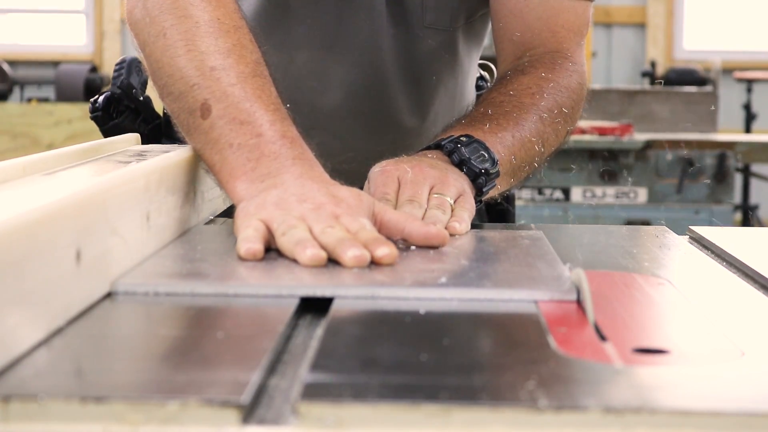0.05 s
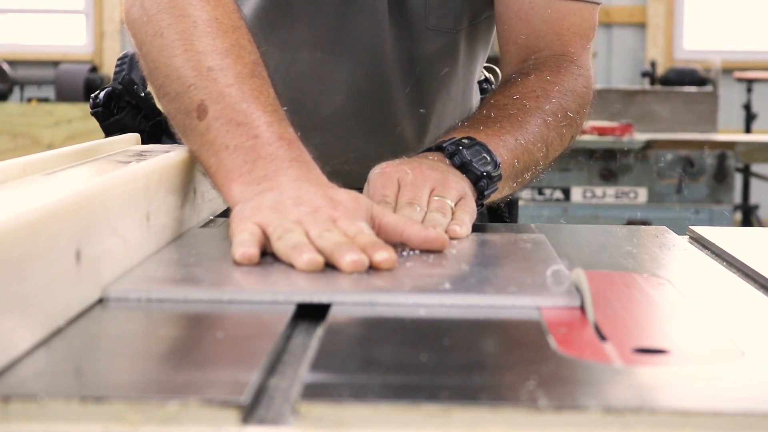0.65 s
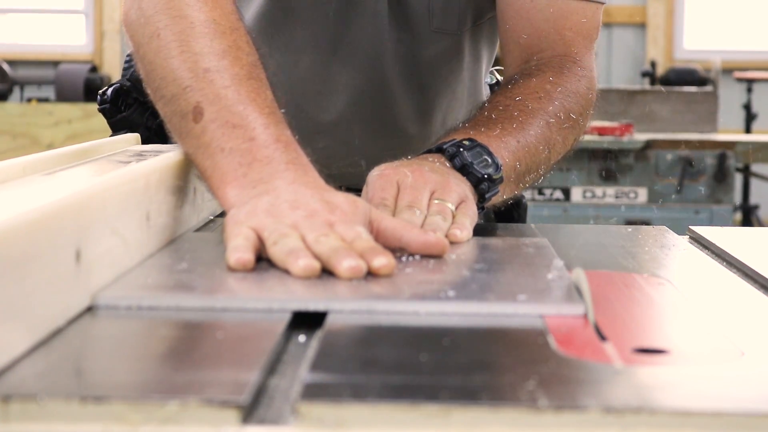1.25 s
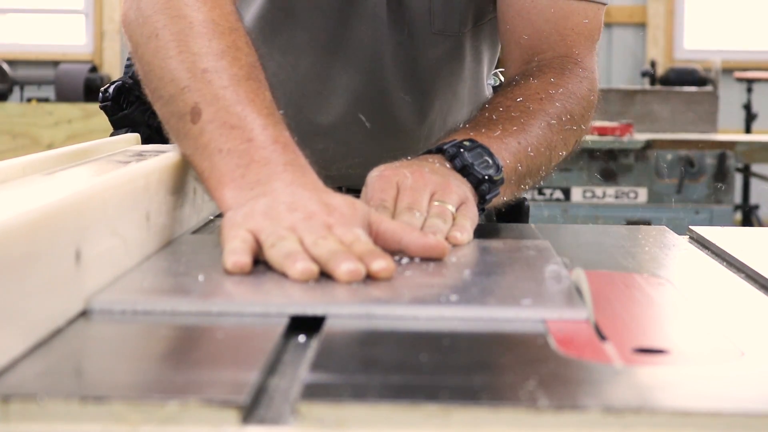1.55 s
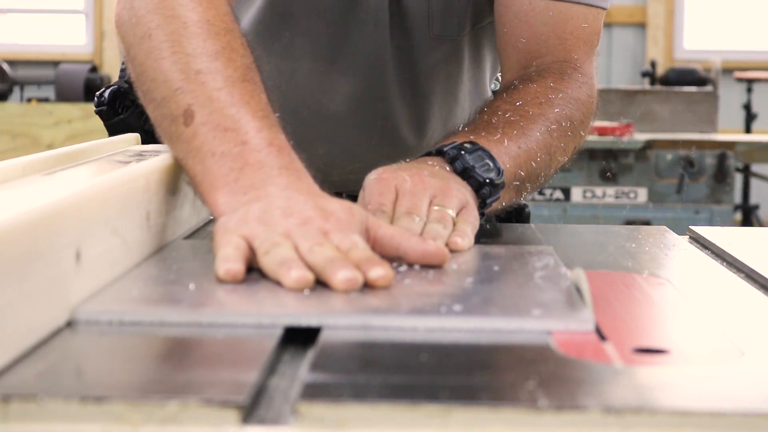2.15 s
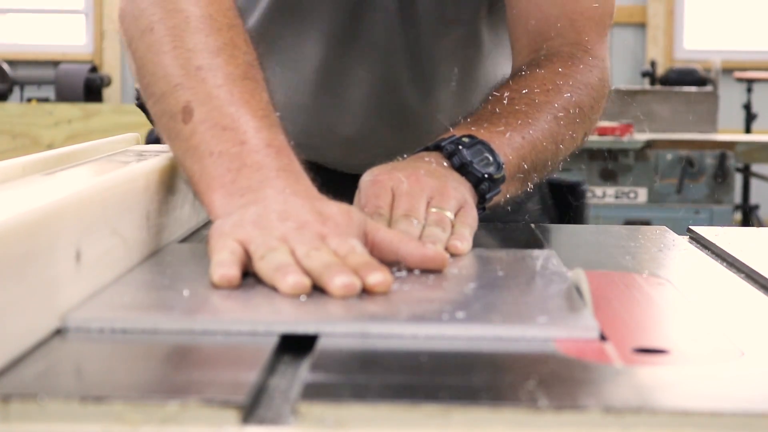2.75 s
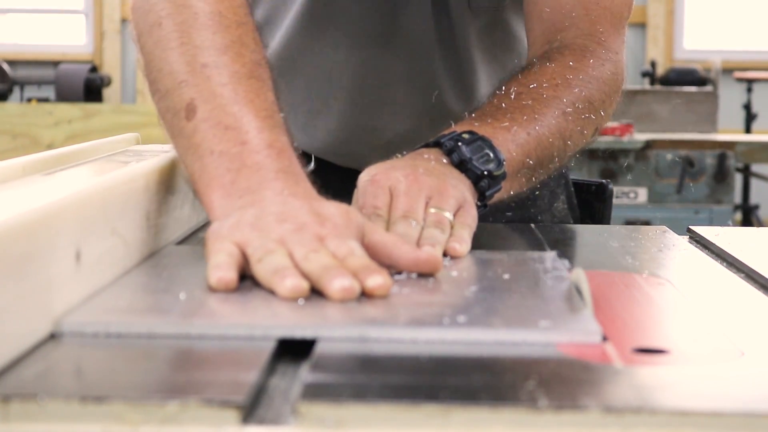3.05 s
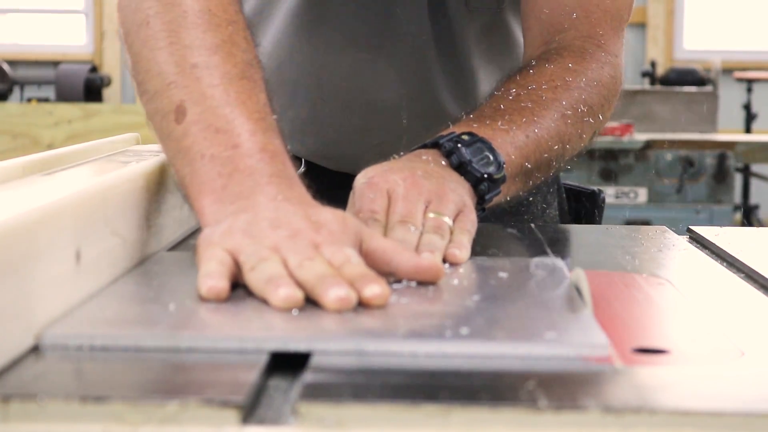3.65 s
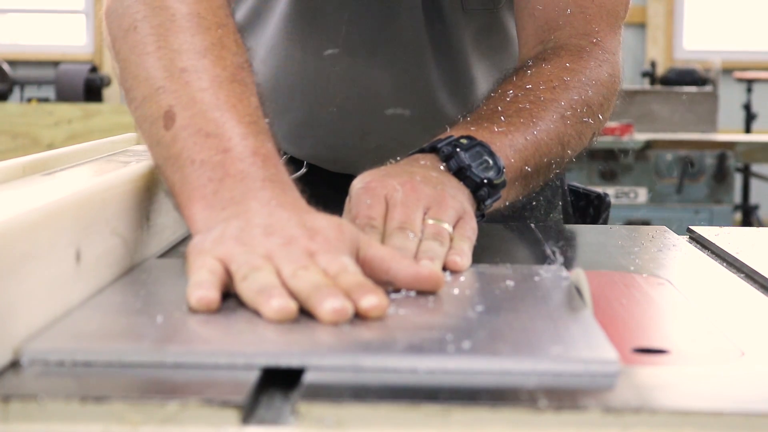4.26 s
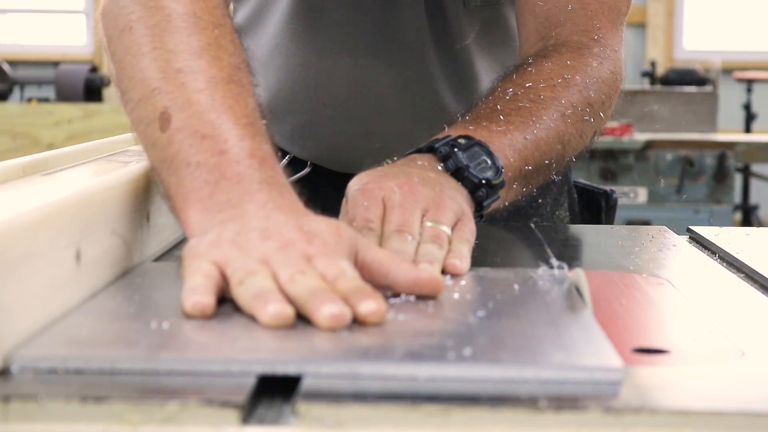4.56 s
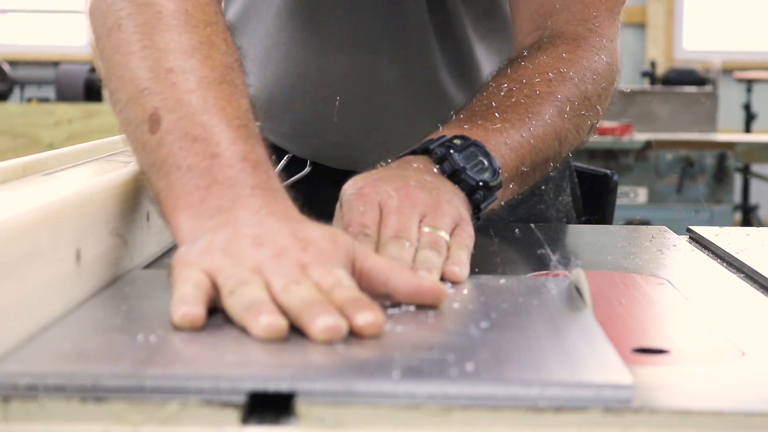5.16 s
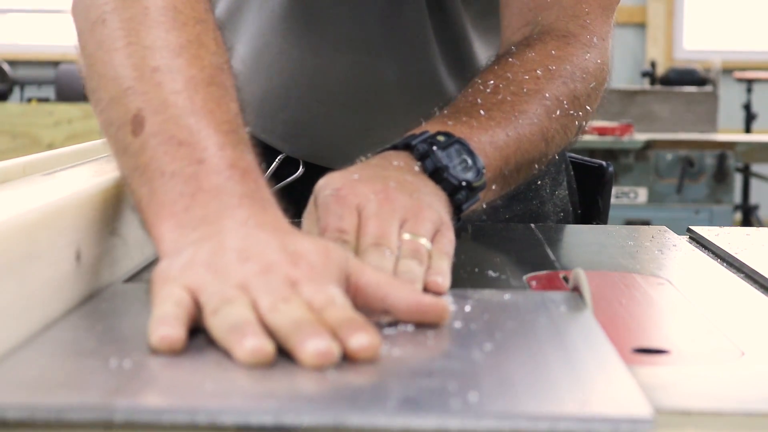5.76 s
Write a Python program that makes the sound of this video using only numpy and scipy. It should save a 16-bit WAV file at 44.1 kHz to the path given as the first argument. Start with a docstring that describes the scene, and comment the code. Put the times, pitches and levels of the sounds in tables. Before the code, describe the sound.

Close, shrill rasping and squealing of a table saw going through thick metal, dropping to an airy whir near the end.

```python
"""A harsh, ringing rasp with squeals on top: a table saw is cutting a thick aluminium plate close by.
Its 60 uneven teeth scrape through the metal turn after turn, the blade chatters and squeals as it
bends, and chips hiss away over a low motor hum. The push on the plate eases briefly near 2.9 s.
At 5.3 s the blade comes free and spins on with a rush of air and a thin whistle."""
import sys
import numpy as np
from scipy import signal
from scipy.fft import rfft, irfft
from scipy.io import wavfile

SR = 44100
rng = np.random.default_rng(int(sys.argv[2]) if len(sys.argv) > 2 else 0)


def persist_wave(psi):
    """Save psi, clipped to +-1, as 16-bit WAV."""
    counts = np.round(np.clip(psi, -1, 1) * 32767).astype(np.int16)
    wavfile.write(sys.argv[1], SR, np.atleast_2d(counts).T)


N = 264600

TEETH, USUAL_TURNS_PER_S = 60, 69.9
# The feed: how hard the plate is pushed into the teeth (0 is usual). Columns: time_s, level_db
FEED = [(0, .8), (.8, 0), (1.7, 0.1), (2.45, -0.3), (2.74, 0.5), (2.83, -3.5), (2.93, -1.5), (3.04, 2.5),
        (3.24, 0), (3.5, .5), (4.3, 0), (5.05, -1.2), (5.28, -3), (5.36, -6.5), (5.5, -11.5), (6, -17)]
# Rise and fall of the plate's drone, which also strains the cabinet. Columns: time_s, level_db
DRONE = [(0, -35), (.5, -34), (.6, -33.5), (1.1, -31.5), (2.2, -32), (2.74, -33), (2.88, -34.5),
         (3.04, -31.5), (3.32, -34), (3.65, -32), (5.08, -34.5), (5.35, -41), (6, -51)]


def from_db(db):
    """Turn decibels into a number to multiply by."""
    return 10 ** (np.asarray(db) / 20)


def rms_one(x):
    """Scale a signal so that its average strength (rms) is 1."""
    return x / np.sqrt(np.mean(x ** 2) + 1e-20)


def curve(rows):
    """Join (time_s, value) points with straight lines, giving one value per sample."""
    return np.interp(np.arange(N) / SR, *np.transpose(rows))


def swell(peak_s, length_s):
    """A smooth rise to 1 and back; the length is its width at half height."""
    offset = np.clip((np.arange(N) / SR - peak_s) / length_s, -1, 1)
    return .5 + .5 * np.cos(np.pi * offset)


def drift(rate_hz):
    """A smooth random wobble of typical size 1, mostly slower than rate_hz."""
    step, warm_up = 40, 2000
    decay = np.exp(-2 * np.pi * step * rate_hz / SR)
    noise = rng.standard_normal(N // step + warm_up + 2)
    slow = signal.lfilter([1], [1, -2 * decay, decay * decay], noise)[warm_up:]
    return np.interp(np.arange(N) / step, np.arange(len(slow)), rms_one(slow))


def colour(x, spectrum):
    """Make some pitches stronger and others weaker."""
    hz, db = np.transpose(spectrum)
    bin_hz = np.maximum(np.arange(N // 2 + 1) * SR / N, 1)
    gain = from_db(np.interp(np.log(bin_hz), np.log(hz), db))
    edge_fade = np.minimum(bin_hz / hz[0], 1) ** 2 * np.minimum(hz[-1] / bin_hz, 1) ** 2
    return rms_one(irfft(rfft(x) * gain * edge_fade, N))


def tone(cycles, flutter_db, rough, rough_hz=25):
    """A ringing note that swells and sags, roughened by uneven blows."""
    flutter = from_db(flutter_db * drift(3.6))
    roughness = 1 + rough * (drift(rough_hz) + 1j * drift(rough_hz))
    return rms_one(flutter * np.real(roughness * np.exp(2j * np.pi * cycles)))


def turning_tones(turns, rows, flutter_db, rough):
    """Notes that follow the blade's speed; rows give their pitches at the usual speed."""
    blade_time = turns / USUAL_TURNS_PER_S
    return sum(from_db(db) * tone(hz * blade_time, flutter_db, rough) for hz, db in rows)


def tooth_force(turns, repeat, memory, uneven_db, chip_db):
    """Every tooth tears off a chip, and each turn meets the wavy face left by the turn before."""
    turn_count, harmonics, warm_up = int(turns[-1]) + 1, 4 * TEETH, 20
    # repeat is the share that is alike on every turn; memory is how much the rest carries over
    lasting = np.exp(2j * np.pi * rng.random(harmonics))
    draws = rng.standard_normal((turn_count + warm_up, harmonics, 2)) @ [1, 1j] / np.sqrt(2)
    renewed = signal.lfilter([np.sqrt(1 - memory ** 2)], [1, -memory], draws, axis=0)[warm_up:]
    per_turn = irfft(np.sqrt(repeat) * lasting + np.sqrt(1 - repeat) * renewed, 2048)
    force = np.interp(turns * per_turn.shape[1], np.arange(per_turn.size), per_turn.ravel())
    # some teeth stick out, and no two chips are equally thick
    teeth_passed = turns * TEETH
    tooth = teeth_passed.astype(int)
    height_db = uneven_db * rng.standard_normal(TEETH)[tooth % TEETH]
    thickness_db = chip_db * rng.standard_normal(tooth[-1] + 1)[tooth]
    contact = 1 + .5 * np.cos(2 * np.pi * teeth_passed)
    return rms_one(force * contact * from_db(height_db + thickness_db))


def background_rumble():
    """A low rumble that comes up near 2.9 s and at the end, where the cut goes quieter."""
    # Loudness of the rumble. Columns: time_s, level_db
    rumble_levels = [(0, -44.5), (1.3, -45), (2.6, -46), (2.9, -42.5), (3.2, -45.5), (4.2, -46), (5.3, -49),
                     (5.7, -42.5), (6, -42.5)]
    # Tone colour of the rumble. Columns: pitch_hz, gain_db
    rumble_colour = [(25, -32), (48, -26), (85, -14), (115, -27), (180, 1.5), (300, 1), (500, -0.5),
                     (800, -1), (1100, -2), (1800, -36)]
    return from_db(curve(rumble_levels)) * colour(rng.standard_normal(N), rumble_colour)


def motor_and_cabinet(turns):
    """The motor hums, and the cabinet's notes ring with the cut."""
    # Notes of the motor, belt and shaft. Columns: pitch_hz, level_db
    hum_notes = [(59.3, -69), (69.9, -61), (103.5, -64.5), (118.4, -60), (177.6, -80), (209.8, -64.5),
                 (258.4, -58), (349.7, -57), (479.1, -61)]
    # Notes of the strained cabinet. Columns: pitch_hz, level_db
    strain_notes = [(139.9, -52.5), (419.5, -59), (559.5, -61.5), (629.4, -57.5), (699.3, -57.5),
                    (769.3, -79.5), (839.2, -55)]
    hum = turning_tones(turns, hum_notes, flutter_db=.5, rough=.03)
    strain = turning_tones(turns, strain_notes, flutter_db=2, rough=.2)
    drone_db = curve(DRONE)
    strain *= from_db(.5 * (drone_db - np.median(drone_db)) - .26)
    return hum + strain


def rushing_air(turns):
    """Air rushes and whistles through the gaps between the teeth, louder as the cut opens."""
    # Loudness of the air thrown off the blade. Columns: time_s, level_db
    rush_levels = [(0, -41), (5.2, -36.5), (5.5, -36.5), (5.75, -32.5), (6, -30.5)]
    # Tone colour of that air. Columns: pitch_hz, gain_db
    rush_colour = [(600, -10), (900, -16.5), (1500, -12), (2200, -9.5), (2700, -4), (3100, 2), (3600, -5.5),
                   (4400, -18.5), (5600, -8.5), (7000, -21), (9000, -19.5), (11500, -15.5), (13500, -20),
                   (16000, -26)]
    # Notes of the freely spinning saw. Columns: pitch_hz, level_db
    whistle_notes = [(177.6, -52), (1077, -40.5), (2821, -50), (2993, -48), (8420, -58), (9020, -58)]
    # How far those notes are turned up or down. Columns: time_s, gain_db
    whistle_gains = [(0, -18), (5.2, -16.5), (5.45, -2), (5.7, -2), (6, 2)]
    puffs = tooth_force(turns, repeat=.14, memory=.11, uneven_db=1, chip_db=1.5)
    rush = from_db(curve(rush_levels)) * colour(puffs, rush_colour)
    whistles = turning_tones(turns, whistle_notes, flutter_db=.6, rough=.06)
    return rush + from_db(curve(whistle_gains)) * whistles


def tooth_whine(turns):
    """The passing teeth make a high note; above it, thin overtones of the squeal at six and seven times its
    pitch throb once a turn."""
    # Rise and fall of the whine. Columns: time_s, level_db
    whine_levels = [(0, -41), (.2, -34), (.8, -52), (1.05, -31), (1.3, -42), (1.7, -32), (2.4, -46),
                    (2.82, -47), (3.08, -35), (3.25, -55), (3.75, -56), (4.28, -32), (4.5, -42),
                    (4.75, -28.5), (5.2, -38), (5.45, -41), (6, -46)]
    # Rise and fall of the squeal's high overtones. Columns: time_s, level_db
    overtone_levels = [(0, -44), (2.2, -40), (3.28, -45), (3.66, -29), (3.92, -38), (4.3, -29.5),
                       (4.62, -35), (5.26, -33), (5.36, -60), (6, -60)]
    teeth_passed = turns * TEETH
    whine = tone(teeth_passed, flutter_db=.8, rough=.22)
    lower = tone(3 * teeth_passed, flutter_db=.5, rough=.4, rough_hz=45)
    upper = from_db(-7) * tone(3.5 * teeth_passed, flutter_db=1, rough=.6, rough_hz=45)
    overtones = (lower + upper) * (1 + .45 * np.cos(2 * np.pi * turns))
    return from_db(curve(whine_levels) - 2) * whine + from_db(curve(overtone_levels) - 5) * overtones


def rim_shrieks():
    """The blade's rim rings at its own pitches and flares as it catches in the cut; close pairs beat."""
    # Moments when the rim catches. Columns: peak_s, length_s, ring_name, level_db
    flares = [(.04, .12, "top", -32), (.05, .06, "high", -28), (.21, .08, "high", -29),
              (0.505, 0.12, "high", -31), (.62, .09, "top", -32), (.86, 0.15, "high", -27),
              (1.02, .07, "low", -33), (1.172, 0.054, "low", -33), (1.18, 0.058, "high", -28),
              (1.264, 0.051, "low", -28), (1.44, 0.099, "high", -26), (1.447, 0.14, "low", -27),
              (1.707, 0.089, "low", -27), (1.78, 0.14, "high", -25), (2.04, .08, "high", -28),
              (2.38, .24, "high", -30.5), (3.07, 0.16, "top", -32), (3.145, 0.12, "high", -24.5),
              (3.41, 0.074, "high", -31), (3.56, .11, "low", -29), (3.66, .05, "high", -33),
              (3.663, 0.04, "top", -32), (3.763, 0.087, "low", -25), (3.87, 0.061, "low", -24.5),
              (3.977, 0.059, "low", -28), (4.15, 0.091, "low", -26), (4.175, .07, "high", -25),
              (4.42, .07, "high", -31), (4.72, 0.097, "high", -33), (5.292, 0.081, "low", -34)]
    seconds = np.arange(N) / SR
    low = from_db(-3.3) * tone(3523.5 * seconds, flutter_db=1.5, rough=.53, rough_hz=30)
    low += from_db(-4.7) * tone(3572 * seconds, flutter_db=1.5, rough=.47, rough_hz=20)
    high = from_db(-2.3) * tone(4756.3 * seconds, flutter_db=.6, rough=.34)
    top = from_db(-1.5) * tone(5109 * seconds, flutter_db=1.5, rough=.3)
    top += from_db(-3) * tone(5185 * seconds, flutter_db=1, rough=.8)
    shrieks = np.zeros(N)
    for name, ring, usual_db in ("low", low, -32.5), ("high", high, -36.5), ("top", top, -38):
        steady = from_db(usual_db + .85 * curve(FEED))
        flaring = sum(from_db(db) * swell(s, length) for s, length, which, db in flares if which == name)
        shrieks += np.hypot(steady, flaring) * ring
    return shrieks


def blade_chatter():
    """The blade shakes at a pitch of its own, whatever its speed."""
    # Rise and fall of the chatter. Columns: time_s, level_db
    chatter_levels = [(0, -33), (.17, -37), (.6, -29), (1.1, -32), (1.6, -36), (2.2, -35), (2.78, -33.5),
                      (2.9, -41), (3.08, -35.5), (3.42, -38), (3.68, -33), (5.15, -35), (5.35, -40.5),
                      (5.55, -62)]
    pitch_hz = 1680.8
    chatter = tone(pitch_hz * np.arange(N) / SR, flutter_db=.8, rough=.06)
    return from_db(curve(chatter_levels) - .6) * chatter


def blade_squeal(turns):
    """The bending blade squeals at half the tooth rate, and throbs as the bent shape turns with it."""
    # Rise and fall of the squeal. Columns: time_s, level_db
    squeal_levels = [(0, -41), (.52, -37.5), (.75, -46), (1.05, -44), (1.25, -38.5), (1.7, -32.5),
                     (2.12, -34.5), (2.3, -31), (2.53, -31), (2.76, -38.5), (3.07, -28.5), (3.17, -32),
                     (3.28, -29), (3.42, -36), (3.8, -33.5), (4.3, -36), (4.72, -28), (5.0, -28),
                     (5.18, -25.5), (5.3, -44), (5.5, -54)]
    # Side notes just below and above the squeal. Columns: offset_cycles_per_turn, gain_db
    side_notes = [(-2, -13), (-1, -2.5), (1, 0), (2, -11)]
    # Bending waves travel at unequal speeds, so side notes lag: a soft squeal warbles, a loud one throbs.
    # Columns: squeal_db, lag_radians
    side_lags = [(-35, 1.05), (-28, .55)]
    squeal_db = curve(squeal_levels)
    angle = 2 * np.pi * turns
    core = from_db(-3 + .8 * drift(3)) * np.cos(TEETH / 2 * angle)
    lag = np.interp(squeal_db, *np.transpose(side_lags))
    throb = sum(from_db(db + drift(4)) * np.cos((TEETH / 2 + offset) * angle - lag * offset ** 2)
                for offset, db in side_notes)
    return np.sqrt(2) * from_db(squeal_db) * (core + from_db(-2) * throb)


def chip_spray(turns, feed_db):
    """Chips hiss away in quick gusts, with a thicker spurt now and then."""
    # Tone colour of the spray. Columns: pitch_hz, gain_db
    chip_colour = [(5500, -3), (6900, -2.5), (7300, -6.5), (7600, -5.5), (8400, 1.5), (9100, -3.5),
                   (9700, -0.5), (10200, -4.5), (11000, -0.5), (11800, 0), (12500, -3), (13300, -5),
                   (14100, -5.5), (15500, -8.5)]
    # Thicker spurts of chips. Columns: peak_s, length_s, rise_db
    spurts = [(0.35, .06, 4), (.66, 0.25, 2), (1.247, .06, 3.5), (2.225, 0.044, 2.5), (2.562, .12, 1.5),
              (3.582, .1, 2.5), (4.27, 0.05, 3), (4.82, 0.21, 3)]
    force = tooth_force(turns, repeat=.087, memory=.6, uneven_db=2, chip_db=2.5)
    spurt_db = sum(db * swell(s, length) for s, length, db in spurts)
    gust_db = .5 * drift(38)
    return from_db(-31 + 1.3 * feed_db + spurt_db + gust_db) * colour(force, chip_colour)


def plate_drone(turns, feed_db):
    """The teeth shake the plate into a drone; ringing notes, several of them side notes of the blade's chatter,
    rise and fall with it."""
    # Notes below the blade's chatter, several of them one turn rate (70 Hz) apart.
    # Columns: pitch_hz, relative_db
    ringing_notes = [(974.4, -52), (1071, -47.5), (1276, -47), (1330, -40), (1400, -42), (1470, -48.5),
                     (1540, -46.5)]
    # Tone colour of the plate. Columns: pitch_hz, gain_db
    plate_colour = [(700, -16.5), (980, -15.5), (1100, -8), (1330, -8.5), (1550, -11), (1850, -9.5),
                    (2200, -5), (2600, -15.5), (3200, -17)]
    ringing = from_db(35) * turning_tones(turns, ringing_notes, flutter_db=1, rough=.28)
    force = tooth_force(turns, repeat=.51, memory=.16, uneven_db=3.5, chip_db=.5)
    return from_db(curve(DRONE) - 1.5 + .24 * feed_db) * (colour(force, plate_colour) + ringing)


def blade_ringing(turns, feed_db):
    """The cutting teeth set the blade ringing, louder with a harder push."""
    # Notes of the blade at the usual feed. Columns: pitch_hz, level_db
    blade_notes = [(2516, -46.5), (2994, -46), (3361, -43), (3430, -81), (3693, -39.5), (3919, -39),
                   (3987, -36.5), (4056, -39), (4126, -41.5), (4336, -40.5), (4411, -37.5), (4478, -62),
                   (4618, -47), (4686, -49), (4966, -53.5), (5033, -52), (5469, -38.5), (5740, -57),
                   (5873, -41.5), (6094, -40.5), (6292, -51), (6433, -68), (7138, -40.5), (7294, -43.5),
                   (7833, -44), (8386, -51), (9668, -41), (10060, -70), (10422, -41.5), (12915, -64)]
    return from_db(1.23 * feed_db) * turning_tones(turns, blade_notes, flutter_db=2, rough=.41)


def tooth_rasp(turns, feed_db):
    """The teeth scrape through the metal; the rasp thins as they break through the far edge."""
    # Tone colour of the scraping. Columns: pitch_hz, gain_db
    rasp_colour = [(2000, -14), (2500, -6), (2850, 1.5), (3100, -6), (3450, 6), (3900, -8.5), (4500, -2.5),
                   (4900, -1), (5250, 7.5), (5700, -3.5), (6300, 2), (6700, -7), (7300, -1.5), (8500, -36)]
    force = tooth_force(turns, repeat=.21, memory=.46, uneven_db=2, chip_db=.7)
    # for a moment one tooth snags, giving a short knock on every turn
    knocks = np.exp(10 * (np.cos(2 * np.pi * turns) - 1))
    snag = 1 + .81 * swell(peak_s=1.1, length_s=.18) * knocks
    breakthrough_db = curve([(3.3, 0), (4.3, -1.5)])
    return from_db(-29.5 + .9 * feed_db + breakthrough_db) * snag * colour(force, rasp_colour)


def cutting(turns):
    """The sounds of the cut waver: the plate moves in unevenly and the blade wobbles once a turn."""
    feed_db = curve(FEED)
    drone = plate_drone(turns, feed_db)
    cut = blade_ringing(turns, feed_db) + tooth_rasp(turns, feed_db) + chip_spray(turns, feed_db)
    judder = from_db(.5 * drift(8.2))
    wobble = from_db(.19 * np.cos(2 * np.pi * turns))
    return judder * (drone + wobble * cut)


def scene():
    """Count the blade's turns and add up all the sounds; both channels are alike."""
    # The blade's speed, which rises when the load eases. Columns: time_s, turns_per_s
    speed = [(0, 69.93), (1.2, 69.87), (2.5, 69.88), (2.88, 70.12), (3.15, 69.9), (4.3, 69.82),
             (5.0, 69.88), (5.2, 70.08), (5.36, 70.42), (6, 70.44)]
    turns = np.cumsum(curve(speed)) / SR
    mix = cutting(turns) + blade_chatter() + blade_squeal(turns) + rim_shrieks() + tooth_whine(turns)
    mix += motor_and_cabinet(turns) + background_rumble() + rushing_air(turns)
    return np.array([mix, mix])


def record(dry):
    """Cut off the very highest treble steeply."""
    cutoff_hz = 15750
    return signal.sosfilt(signal.ellip(12, .1, 90, cutoff_hz, fs=SR, output="sos"), dry)


dry = scene()
out = record(dry)
persist_wave(out)
```